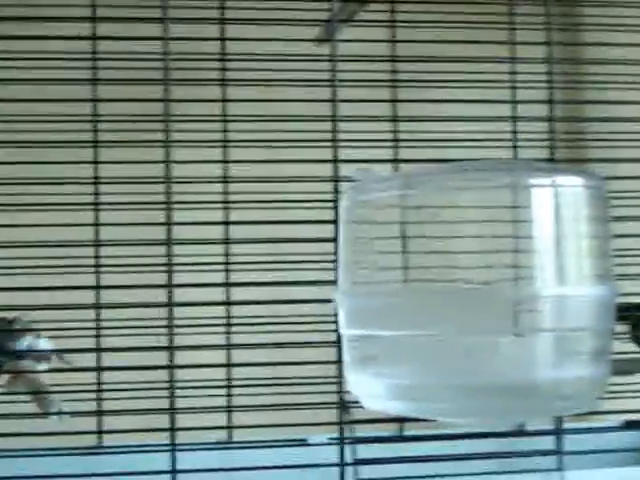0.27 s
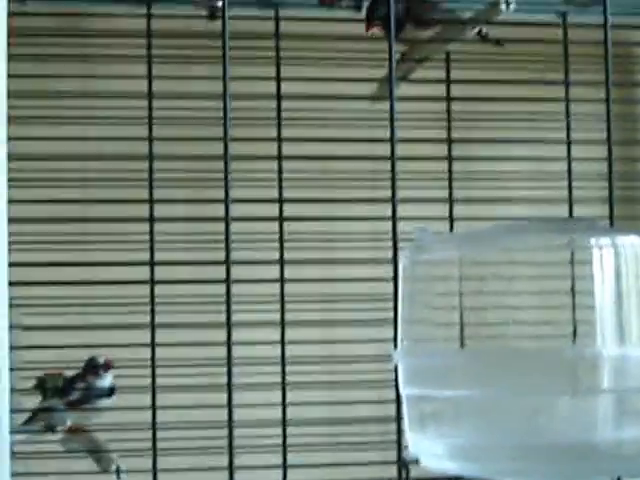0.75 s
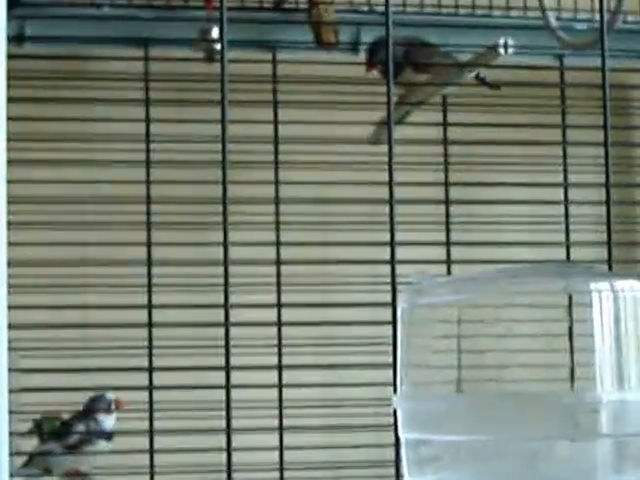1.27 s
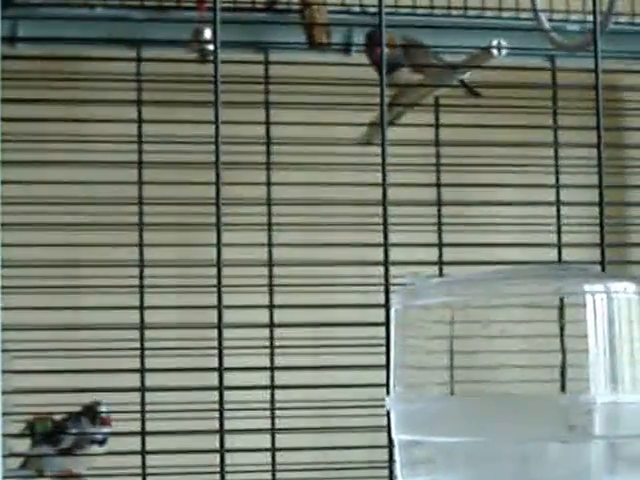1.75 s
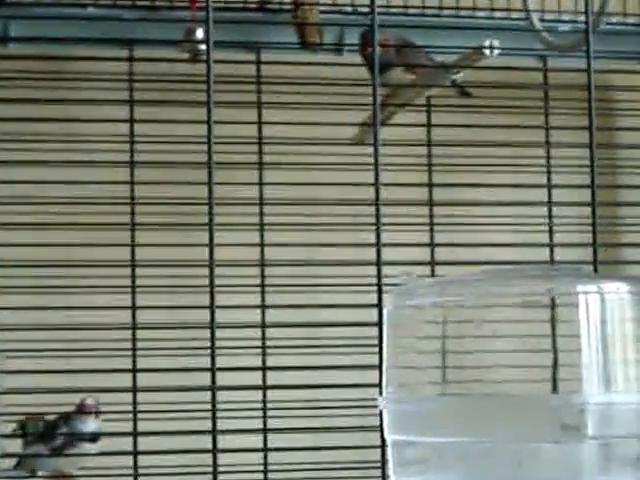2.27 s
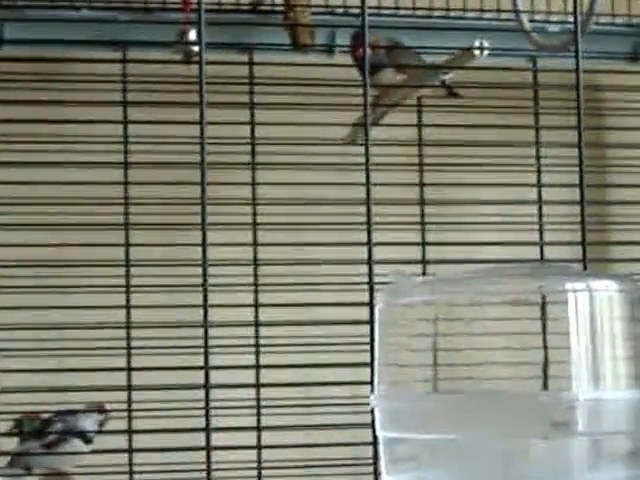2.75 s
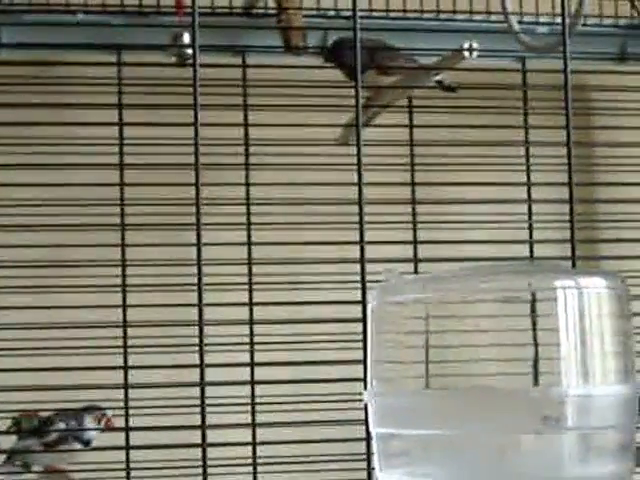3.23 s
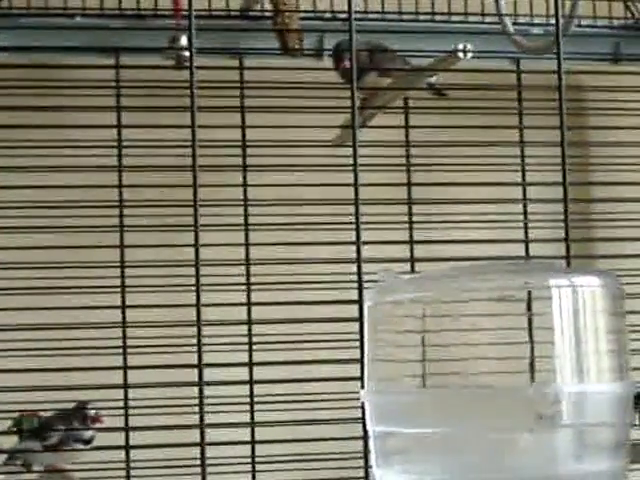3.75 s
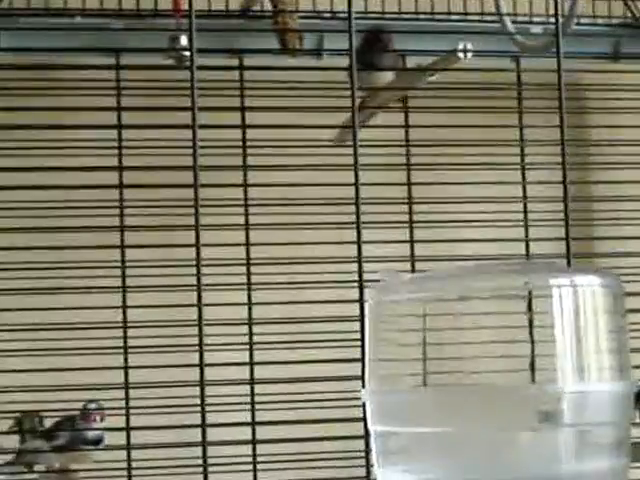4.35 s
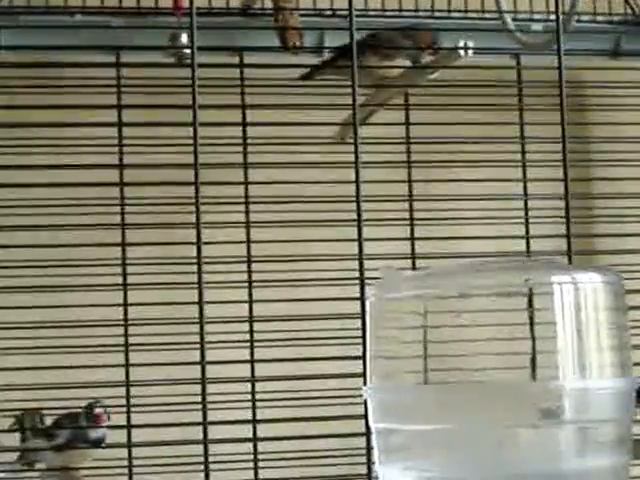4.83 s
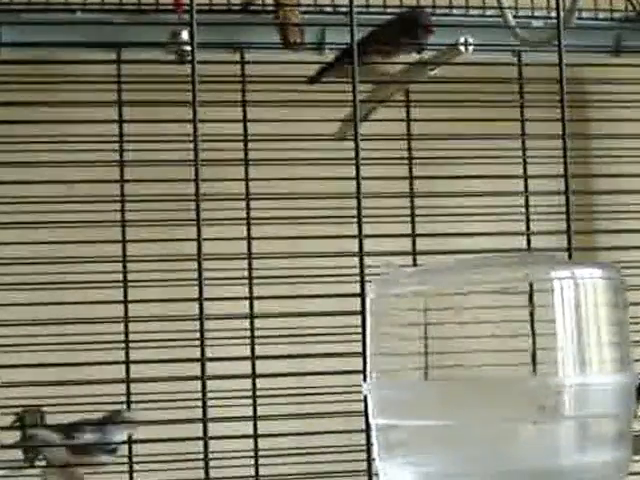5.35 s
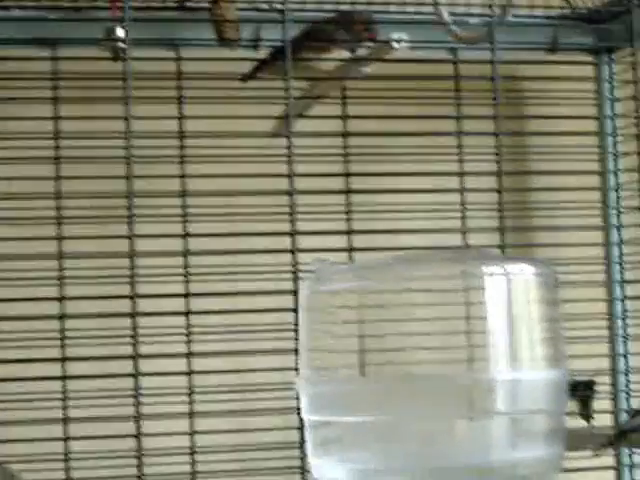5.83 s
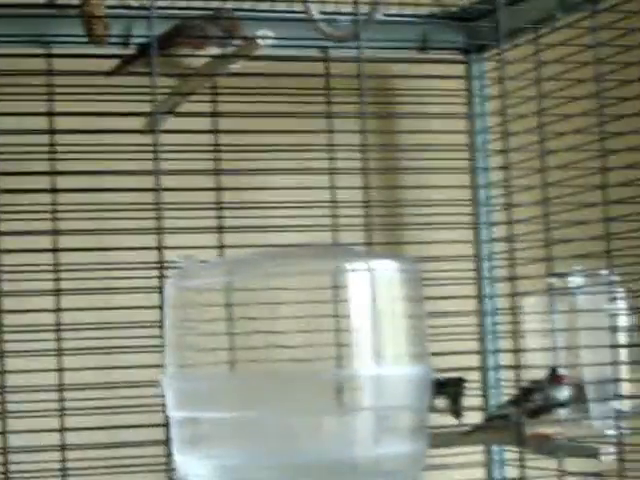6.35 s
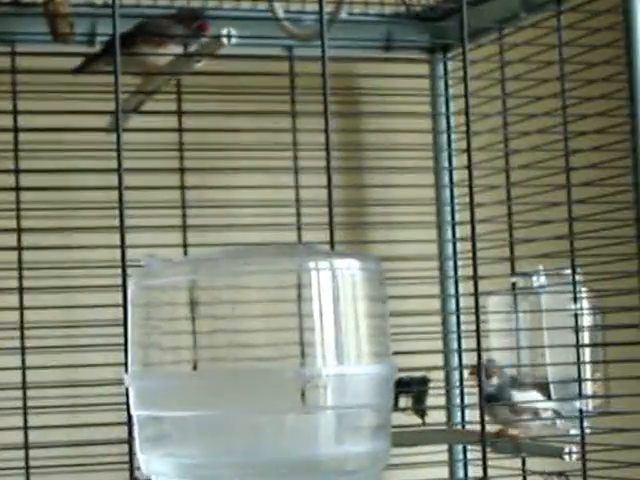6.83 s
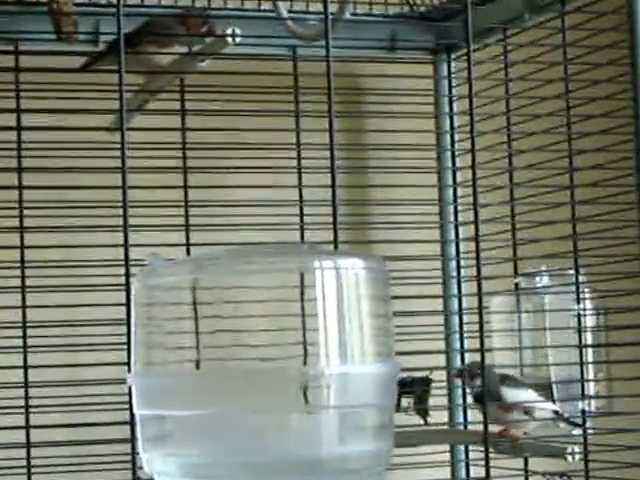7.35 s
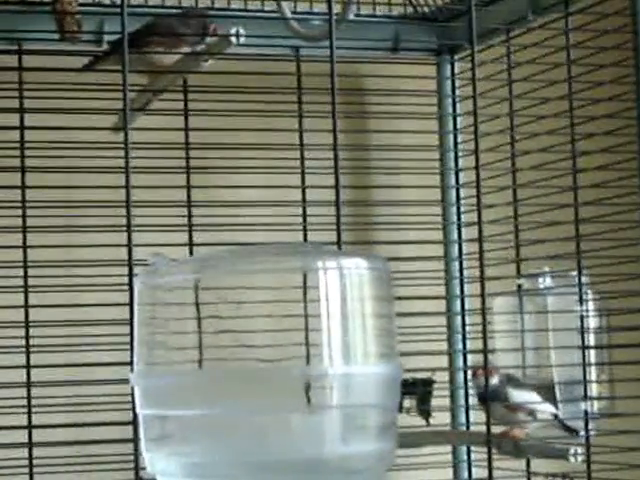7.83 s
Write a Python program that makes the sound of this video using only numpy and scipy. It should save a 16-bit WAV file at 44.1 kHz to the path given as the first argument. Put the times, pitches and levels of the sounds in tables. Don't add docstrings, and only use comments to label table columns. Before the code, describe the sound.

Over a steady low fan hum and light hiss, finches utter tiny reedy honks, bright with overtones, some answered by softer, duller ones. A quick wooden clatter comes before the middle, then more calls, a soft puffing wing flutter and two harsher, down-swooping beeps. Faint high peeps sound far off. The furnished room adds short echoes; the camera ticks delicately in spells.

```python
import sys
import numpy as np
from scipy import signal
from scipy.fft import rfft, irfft
from scipy.io import wavfile
from scipy.ndimage import uniform_filter1d, minimum_filter1d

SR = 44100
rng = np.random.default_rng(int(sys.argv[2]) if len(sys.argv) > 2 else 0)


def how_loud(loudness_db):
    steps = np.asarray(loudness_db, float) / 20
    return 10 ** steps


def materialize(psi):
    bounded = np.clip(np.atleast_2d(psi).T, -1, 1)
    quanta = np.round(bounded * 32767).astype(np.int16)
    wavfile.write(sys.argv[1], SR, quanta)


N = 356769


def at_hz(points, hz):
    table_hz, values = np.transpose(points)
    return np.interp(np.log(hz), np.log(table_hz), values)


def rms_one(x):
    return x / np.sqrt(np.mean(x ** 2) + 1e-20)


def add(out, s, x):
    i = round(s * SR)
    out[i:i + len(x)] += x[:N - i]


def wobble(shape, rate_hz):
    smoother = signal.butter(2, rate_hz, fs=SR, output="sos")
    slow = signal.sosfilt(smoother, rng.standard_normal((shape[0], 6000)))
    return rms_one(slow[:, 1000:])[:, :shape[1]]


def resonance(x, hz, width_hz):
    r = np.exp(-np.pi * width_hz / SR)
    return signal.lfilter([(1 - r * r) / 2, 0, (r * r - 1) / 2], [1, -2 * r * np.cos(2 * np.pi * hz / SR), r * r], x)


def finches():
    # (time [s], length [s], top or settled pitch [Hz], level [dB], highs [dB])
    arches = [
        (1.316, 0.072, 584, -24.5, -2),
        (4.723, 0.074, 588, -25, -1),
        (5.142, .063, 592, -23, -1),
        (6.822, 0.047, 587, -24, -3),
        (7.992, 0.063, 589.3, -23.5, -3),
    ]
    raised = [
        (2.074, 0.062, 595.7, -25, -2.5),
        (2.474, 0.062, 597, -25.5, -0.5),
        (3.773, .07, 584, -25.5, -2),
    ]
    falling_answers = [
        (1.487, 0.055, 574.4, -28, -9),
        (3.917, 0.05, 576.6, -28, -9),
        (7.031, .053, 584.4, -29.5, -6.5),
    ]
    low_calls = [
        (5.026, 0.0875, 520, -32, -17.5),
    ]
    swept_calls = [
        (6.585, .083, 574, -24, -5),
        (6.732, .084, 572, -21, -3.5),
    ]
    # (top at [share of length], pitch rise [share], pitch fall [share], swell [dB], full at [share of length],
    # first push [dB], highs lost at start [dB], highs lost at end [dB], beak resonance [Hz], its lift [dB])
    arch_rule = (.48, .078, .04, 5.5, .95, 5, 5, 8, 3850, 3)
    raised_rule = (.44, .075, .062, 8.5, .6, 5, -2, 5, 4080, 6)
    answer_rule = (.3, .07, .13, 2, .4, 5, 7, 3, 3020, 9)
    low_rule = (.75, .058, .014, 6, .4, 3, -3, 5, 3080, 4)
    sweep_rule = (.45, .01, .035, -8, .5, -5, 5, 2.5, 3800, 4)
    arch_colour = (-38, -10.5, -24.5, -15.5, -6, -3, -4.5, -2, -3.5, -2.3, -14.5, -16, -22, -25)
    raised_colour = (-30, -9.5, -19.5, -13.5, -5.5, -3.5, -.5, -6.5, -4.5, -1, -14, -11.5, -24.5, -25.5)
    answer_colour = (-22, -5.5, -8, -15, -1, -5.5, -5, -4.5, -12.5, -14, -10.5, -16.5, -20, -22.5)
    low_colour = (-24, -4.5, -7, -7, 2, 2.5, -5, -12, -6, -28, -26, -33, -33, -29)
    sweep_colour = (-17, -12, -12.5, -9, -1, 0, -4.5, 1.5, -10.5, -4, -14, -23, -27, -27.5)
    head_turn_db = 1.2
    out = np.zeros(N)
    for rows, rule, colour, jitter, shimmer_db, attack_s, sag, flicker, swept in (
            (arches, arch_rule, arch_colour, .002, 2.2, .011, .07, .19, False),
            (raised, raised_rule, raised_colour, .002, 2.2, .011, .07, .19, False),
            (falling_answers, answer_rule, answer_colour, .003, 2.4, .014, .05, .19, False),
            (low_calls, low_rule, low_colour, .0015, 1.5, .008, .035, .08, False),
            (swept_calls, sweep_rule, sweep_colour, .0015, 2, .003, .04, .07, True)):
        for row in rows:
            turned = colour + head_turn_db * rng.standard_normal(len(colour))
            shape = contour(*row, rule, swept)
            add(out, row[0], call(shape, turned, jitter, shimmer_db, rule[-1], attack_s, sag, flicker))
    return out


def contour(s, length, hz, level_db, highs_db, rule, swept):
    rise_bend, fall_bend = 1.7, 1.3
    sweep_start_hz, period_growth = 2472, .0355
    onset_s = 0.0057
    beak_opening = .07
    top, rise, fall, swell_db, full, onset_db, shut_db, close_db, beak_hz, _ = rule
    u = np.linspace(0, 1, num=40)
    before = np.clip(1 - u / top, 0, 1)
    after = np.clip((u - top) / (1 - top), 0, 1)
    pitch = hz * (1 - rise * before ** rise_bend - fall * after ** fall_bend)
    if swept:
        pitch = np.maximum(pitch, 1 / (1 / sweep_start_hz + period_growth * u * length))
    level = level_db - swell_db * np.clip(1 - u / full, 0, 1) + onset_db * np.exp(-u * length / onset_s)
    highs = highs_db - shut_db * before ** 2 - close_db * after
    beak = beak_hz * (1 + beak_opening * (u - .5))
    return np.transpose([s + u * length, pitch, level, beak, highs])


def call(rows, colour_db, jitter, shimmer_db, beak_db, attack_s, sag, flicker):
    lows_lag = 2.1
    s, *columns = np.transpose(rows)
    t = np.arange(s[0], s[-1] + 0.0079, 1 / SR)
    pitch, level_db, beak, highs_db = [
        uniform_filter1d(np.interp(t, s, c), size=130, mode="nearest") for c in columns]
    settled = pitch[2 * len(t) // 3]
    strain = np.clip(pitch / settled - 1.1, 0, .4) / .4
    pitch = pitch * (1 - sag * np.exp((t - t[-1]) / 0.0045))
    pitch = pitch * (1 + (jitter + .014 * strain) * wobble((1, len(t)), 250)[0])

    k = np.arange(1, 21)[:, None]
    hz = k * pitch
    colour_db = np.interp(hz / settled, [*range(1, 15), 18], [*colour_db, colour_db[-1] - 8.0])
    beak_lift_db = beak_db / (1 + ((hz - beak) / 400) ** 2)
    gain = how_loud(colour_db + beak_lift_db) * (hz < 11000)
    high = np.clip((hz - 4600) / 600, 0, 1)
    low_rms, high_rms = [
        np.sqrt(np.sum((gain * part) ** 2, axis=0) / 2 + 1e-9) for part in (1 - high, high)]
    gain = gain * ((1 - high) / low_rms + high * how_loud(highs_db) / high_rms)
    gain = gain * how_loud(shimmer_db * wobble(hz.shape, 39))
    gain = gain * (1 + (flicker + .3 * strain) * wobble(hz.shape, 500))

    phase = k * 2 * np.pi * np.cumsum(pitch) / SR + rng.normal(0, .45, (20, 1))
    opening = (t - t[0]) / (attack_s * (.5 + hz / 6000))
    closing = (t[-1] - t) / .006
    edges = np.clip(np.minimum(opening, closing), 0, 1) ** 1.2
    slow_lows = np.clip((t - t[0]) / (lows_lag * attack_s), 0, 1) ** 2
    edges = edges * np.where(hz < 1400, slow_lows, 1)
    return how_loud(level_db) * np.sum(edges * gain * np.sin(phase), axis=0)


def far_peeps():
    # (time [s], pitch [Hz], length [s], level [dB])
    peep_events = [
        (3.454, 4300, .012, -56),
        (5.85, 9600, 0.013, -44),
        (6.05, 4320, 0.026, -52.5),
    ]
    out = np.zeros(N)
    for s, hz, length, level_db in peep_events:
        t = np.arange(0, length, 1 / SR)
        add(out, s, how_loud(level_db) * np.sin(np.pi * t / length) * np.sin(2 * np.pi * hz * t))
    return out


def perch():
    # (time [s], peak [dB])
    knock_events = [
        (3.31, -23.5),
        (3.3149, -33),
        (3.322, -30),
        (3.333, -29.5),
        (3.343, -39),
        (3.352, -31.5),
        (3.368, -37),
    ]
    # (frequency [Hz], level [dB], t60 [s])
    wood_modes = [(151, -13, 0.039), (280, -5, 0.056), (530, -10, .03), (700, -8, .02), (920, 6, 0.025),
                  (1050, 1, 0.023), (1230, -3, .02), (1560, -6, 0.025), (1900, -2, 0.026), (2170, -3, .02),
                  (2430, -12, 0.026), (2820, -24, .02)]
    out, t = np.zeros(N), np.arange(0, .15, 1 / SR)
    for s, peak_db in knock_events:
        for hz, level_db, t60 in wood_modes:
            strength_db = peak_db + level_db - 12.5 + rng.normal(0, 2.7)
            add(out, s, how_loud(strength_db - 60 * t / t60) * np.sin(2 * np.pi * hz * t))
    return out


def wings():
    # (time [s], peak [dB])
    downstrokes = [
        (5.5114, -42),
        (5.5507, -39),
        (5.5912, -38.5),
        (5.6286, -54),
        (5.678, -41),
        (5.7194, -38),
        (5.761, -42),
        (5.8607, -44),
    ]
    out, t = np.zeros(N), np.arange(0, .05, 1 / SR)
    feathers = signal.butter(1, [1500, 9000], "band", fs=SR, output="sos")
    for s, peak_db in downstrokes:
        puff = rms_one(signal.sosfilt(feathers, rng.standard_normal(len(t))))
        add(out, s - .005, how_loud(peak_db - 9.0) * puff * t / 0.0091 * np.exp(1 - t / 0.0081))
    return out


def room(x, early_db, near_db, late_db):
    # (frequency [Hz], t60 [s])
    decay_times = [(500, 0.58), (2000, 0.34), (4000, 0.39), (6000, 0.32), (10000, 0.19)]
    # (delay [s], level [dB])
    wall_echoes = [(0.0146, -20.5), (0.0236, -12), (.031, -15.5), (.044, -16.5), (.058, -24)]
    # (frequency [Hz], level [dB], t60 [s])
    ringing_wires = [(4230, -62, 1), (5180, -78, .3)]
    t = np.arange(0, .6, 1 / SR)
    tail, edges = np.zeros(len(t)), 400 * 2 ** np.arange(0, 5.1, .5)
    for low, high in zip(edges, edges[1:]):
        band_filter = signal.butter(2, [low, high], "band", fs=SR, output="sos")
        band = signal.sosfilt(band_filter, rng.standard_normal(len(t)))
        t60 = at_hz(decay_times, np.sqrt(low * high))
        tail += rms_one(band) * np.sqrt(high - low) * how_loud(-60 * t / t60)
    tail *= np.clip(t / 0.022, 0, 1)
    near = rng.standard_normal(len(t)) * how_loud(-60 * t / .14) * np.clip(t / .004, 0, 1)
    reply = how_loud(late_db) * tail / np.sqrt(np.sum(tail ** 2))
    reply += how_loud(near_db) * near / np.sqrt(np.sum(near ** 2))
    lags = rng.uniform(.0006, .012, 9)
    reply[(lags * SR).astype(int)] += how_loud(early_db - 150 * lags) * rng.choice([-1, 1], 9)
    for hz, level_db, t60 in ringing_wires:
        reply += how_loud(level_db - 60 * t / t60) * np.sin(2 * np.pi * hz * t)
    for lag, level_db in wall_echoes:
        add(reply, lag, how_loud(level_db) * np.array([.5, .5]))
    return x + signal.fftconvolve(x, reply)[:N]


def camera():
    # (first [s], last [s], level [dB], beats taken [share])
    tick_spells = [
        (.07, .66, -49.5, 0.88),
        (.77, 1.29, -48.5, .55),
        (1.77, 2.06, -49.5, 0.96),
        (2.8, 3.36, -47, 0.81),
        (3.57, 3.76, -47.5, 1),
        (6.17, 6.56, -46.5, 0.78),
        (7.24, 7.43, -45.5, 0.75),
        (7.84, 7.87, -49, .95),
    ]
    # (frequency [Hz], level [dB], t60 [s])
    housing_modes = [(2900, -17, .02), (3420, 2, 0.031), (3910, -2, 0.025), (4480, -4, .02)]
    first_beat_s, beat_s, spread_db = .078, .03337, 2.2
    out, t = np.zeros(N), np.arange(0, .04, 1 / SR)
    beats = np.arange(first_beat_s, N / SR, beat_s)
    chance = rng.random(len(beats))
    spread = rng.standard_normal((len(beats), 1 + len(housing_modes)))
    for first, last, tick_db, share in tick_spells:
        for k in np.flatnonzero((beats > first) & (beats < last) & (chance < share)):
            for (hz, level_db, t60), own in zip(housing_modes, spread[k, 1:]):
                strength_db = tick_db + level_db + spread_db * (spread[k, 0] + own)
                swing = how_loud(strength_db - 60 * t / t60) * np.clip(t / .002, 0, 1)
                add(out, beats[k], swing * np.sin(2 * np.pi * hz * t))
    return out


def fan():
    # (frequency [Hz], density [dB per Hz])
    fan_colour = [(12, -53), (20, -14), (86, -18), (114, -10.5), (225, -7.5), (291, -1.5), (388, -11),
                  (419, -8.5),
                  (558, -9), (868, -10.5), (1350, -22.5), (1460, -20), (2160, -24.5), (3440, -26),
                   (10000, -35.5)]
    # (time [s], rumble level [dB])
    load_curve = [(0.0, -44), (1.04, -42.5), (1.4, -43), (5.4, -44.5), (5.74, -42), (6.199, -43.5),
                  (8.09, -45)]
    # (frequency [Hz], width [Hz], level [dB])
    casing_tones = [(33, 6, -81), (272.1, 25.5, -53.5), (296.5, 9.9, -50), (604, 11.6, -56.5),
                    (1195, 15, -67.5), (1427, 10, -66.5), (8900, 60, -72)]
    blade_levels = [-62, -52.5, -62, -58, -54.5]
    blade_hz, hiss_db = 169.25, -63
    hz = np.maximum(np.arange(N // 2 + 1) * SR / N, 1)
    colour_db = at_hz(fan_colour, np.minimum(hz, 9900))
    noise = rfft(rng.standard_normal(N)) * how_loud(colour_db)
    s, rumble_db = np.transpose(load_curve)
    upper = hz ** 2 / (hz ** 2 + 1500 ** 2)
    out = np.zeros(N)
    for share, low, high, level_db in ((1 - upper, 100, 900, rumble_db - 0.5), (upper, 8000, 9800, hiss_db + 0 * s)):
        in_band = np.std(irfft(noise * (hz > low) * (hz < high), N))
        out += irfft(noise * share, N) / in_band * how_loud(np.interp(np.arange(N) / SR, s, level_db))
    for tone_hz, width_hz, level_db in casing_tones:
        tone = resonance(rng.standard_normal(N), tone_hz, width_hz)
        out += how_loud(level_db) * rms_one(resonance(tone, tone_hz, width_hz))
    wander = 1.49 * rms_one(np.cumsum(rng.standard_normal(N)))
    turn = 2 * np.pi * blade_hz * np.arange(N) / SR + wander
    for k, level_db in enumerate(blade_levels):
        out += how_loud(level_db) * np.sqrt(2) * np.sin((k + 1) * turn + k)
    return out


def scene():
    sources = finches() + far_peeps() + perch() + wings()
    caged = room(sources, early_db=-11.6, near_db=-9.6, late_db=-10.8)
    return (how_loud(-2.0) * caged + fan() + camera())[None]


def duck_highs(dry):
    # (end [s], length [s], above [Hz])
    dropouts = [(1.322, .006, 5000), (1.568, .005, 5000), (2.08, .007, 4800), (2.478, .007, 4300),
                (3.775, .009, 2500), (3.914, .005, 5500), (4.722, .016, 3500), (5.141, .007, 3500),
                (6.585, .011, 1800), (6.732, .012, 1600), (7.03, .008, 6000), (7.991, .013, 3000)]
    x, t = dry.copy(), np.arange(N) / SR
    for end, length, hz in dropouts:
        i = slice(round((end - .06) * SR), round((end + .03) * SR))
        highs = signal.sosfiltfilt(signal.butter(4, hz, "high", fs=SR, output="sos"), dry[0, i])
        x[0, i] -= highs * np.clip(np.minimum(end - t[i], t[i] - end + length) / 0.0052 + .5, 0, 1)
    return x


def thin_treble(x, quiet_share, busy_share):
    hz, _, spectrum = signal.stft(x, SR, nperseg=512)
    treble = np.sum(np.abs(spectrum[hz > 2000]) ** 2, axis=0)
    nearby_peak = -minimum_filter1d(-treble, size=9)
    busy = nearby_peak > 30 * np.median(treble)
    band = (hz // 700).astype(int)
    power = np.array([np.sum(np.abs(spectrum[band == b]) ** 2, axis=0) for b in range(band[-1] + 1)])
    weak = power < 25 * np.median(power, axis=1, keepdims=True)
    chance = rng.random((len(power), len(treble) // 2 + 1))
    chance = np.repeat(chance, 2, axis=1)[:, :len(treble)]
    empty = weak & (chance < np.where(busy, busy_share, quiet_share))
    removed = empty[band] & (hz[:, None] > 4900)
    return signal.istft(spectrum * ~removed, SR, nperseg=512)[1][..., :N]


def band_limit(x):
    return signal.sosfilt(signal.butter(12, 10260, fs=SR, output="sos"), x)


def record(dry):
    x = duck_highs(dry)
    x = thin_treble(x[0], quiet_share=.02, busy_share=.13)[None]
    top_cut = signal.ellip(12, .3, 60, 10090, fs=SR, output="sos")
    x = signal.sosfilt(top_cut, x)
    return band_limit(x)


dry = scene()
out = record(dry)
materialize(out)
```